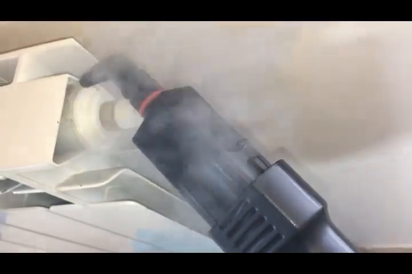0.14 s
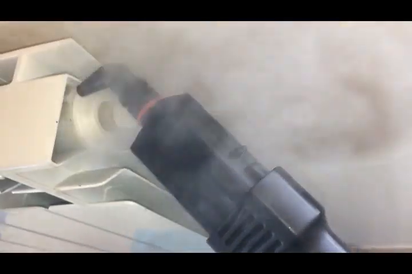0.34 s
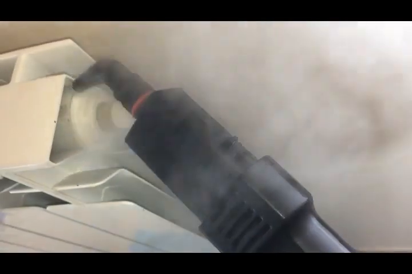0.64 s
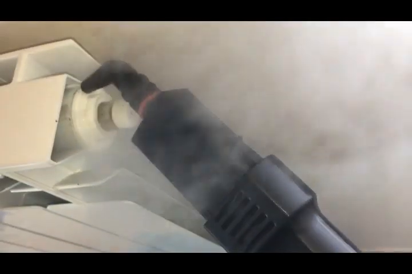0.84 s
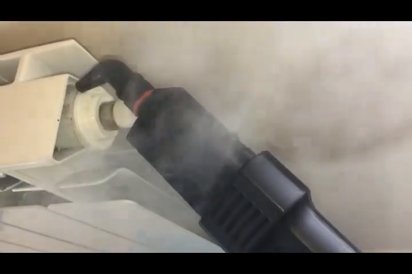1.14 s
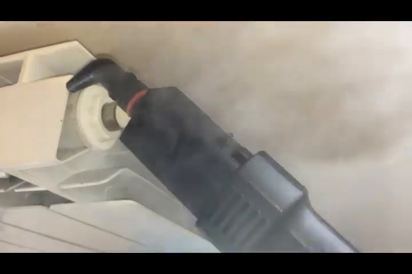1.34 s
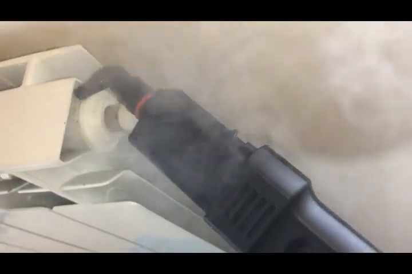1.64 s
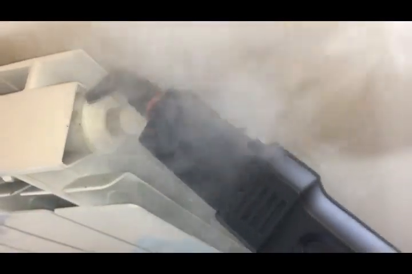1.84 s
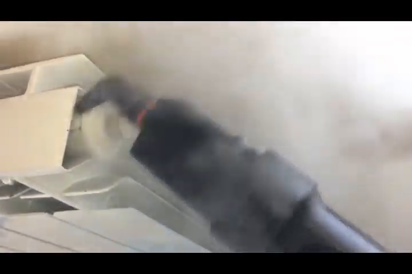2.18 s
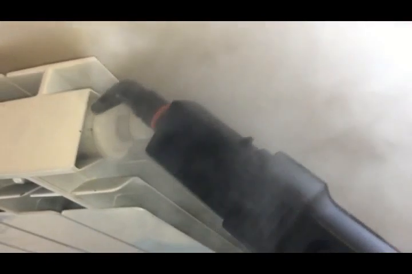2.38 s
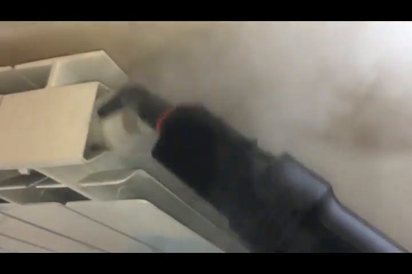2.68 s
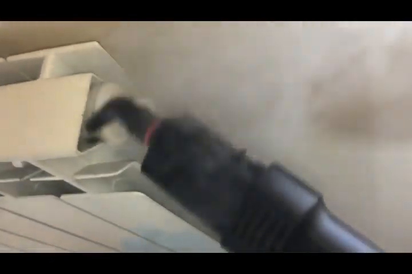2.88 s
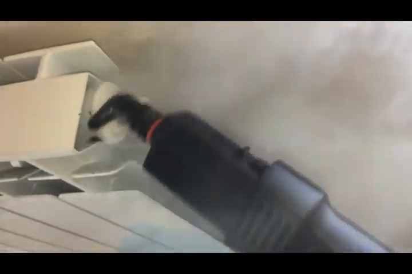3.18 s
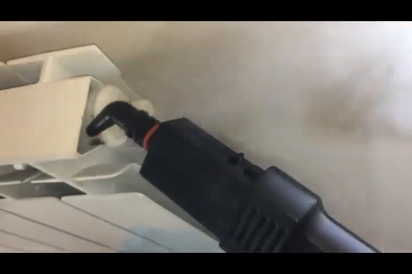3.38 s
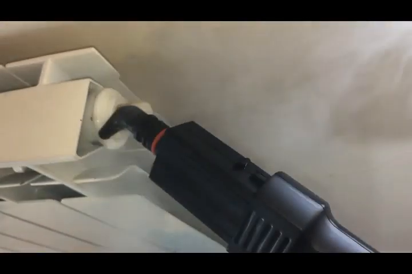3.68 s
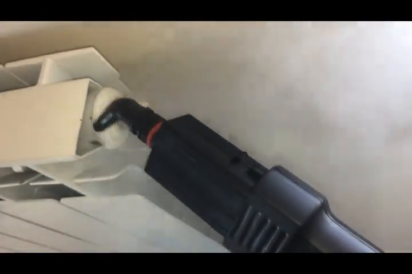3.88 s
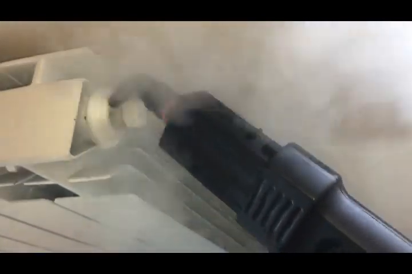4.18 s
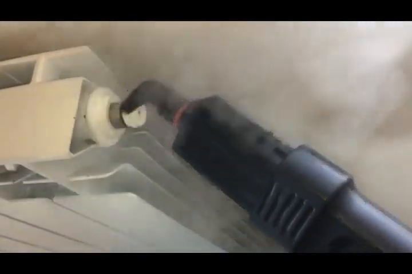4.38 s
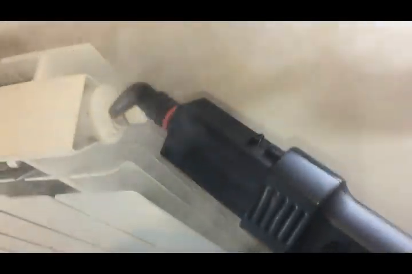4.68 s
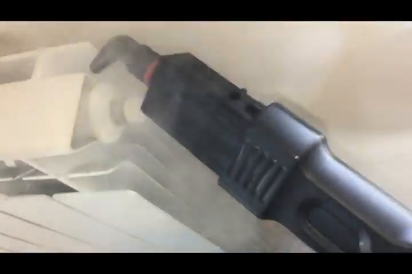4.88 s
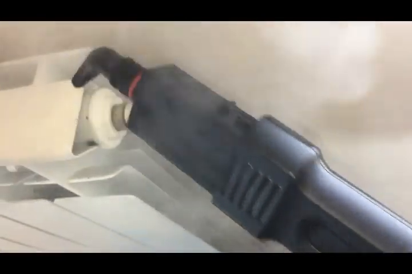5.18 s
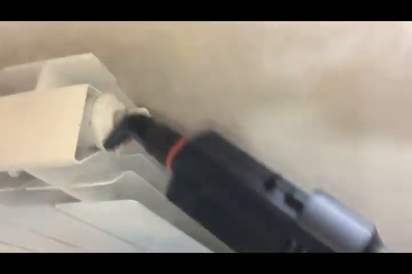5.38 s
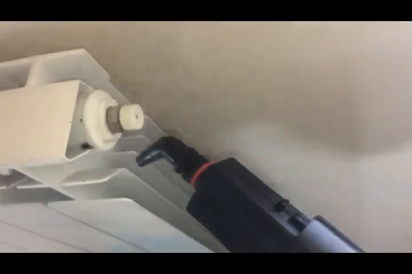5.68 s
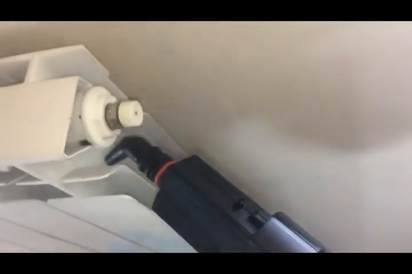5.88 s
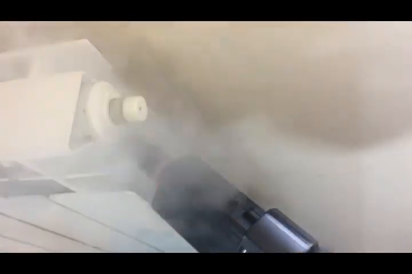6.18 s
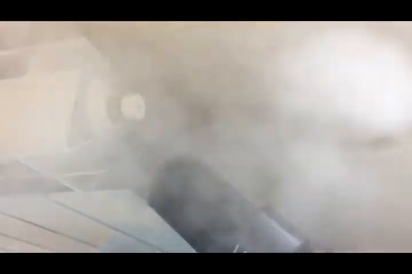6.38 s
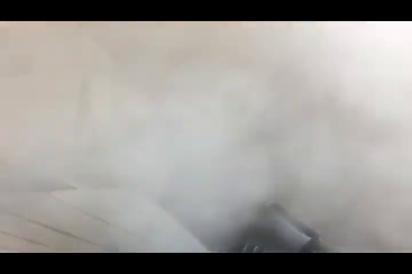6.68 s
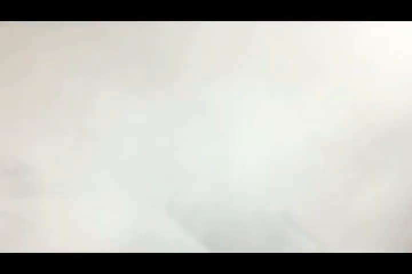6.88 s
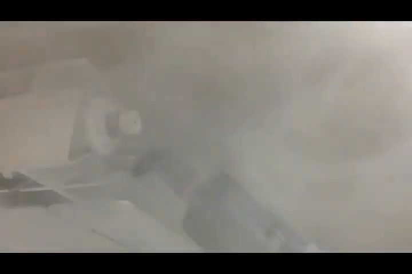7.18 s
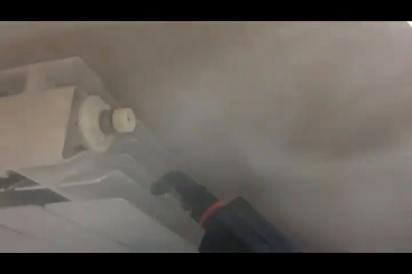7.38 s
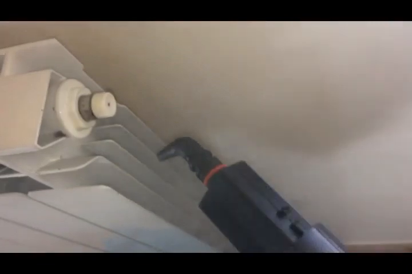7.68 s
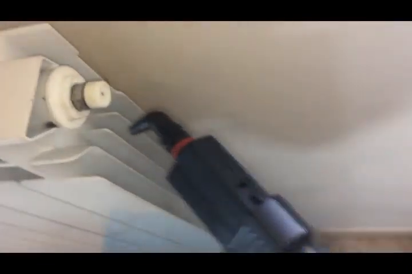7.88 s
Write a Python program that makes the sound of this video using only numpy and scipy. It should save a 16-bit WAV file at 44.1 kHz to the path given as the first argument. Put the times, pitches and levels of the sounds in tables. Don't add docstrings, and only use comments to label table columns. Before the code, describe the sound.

A handheld steam cleaner works on a metal radiator, very close to the microphone in a room with little echo. Loud, bright hissing is already under way at the start, wavering quickly as the nozzle moves. From about 0.9 seconds it weakens, and at 1.3 a small valve click cuts it to a dying leak. After a near-silent gap, a hollow plastic clack at 1.55 releases a sharp puff and a long rough blast. Water droplets make it sputter; its tone sweeps and hollows out, over soft rumbling and breathy ringing from the fins near 2 kHz. Around 4 to 5 seconds the aim dips and the colour changes. Released at 5.4, the hiss sinks steadily until about 6.0, when a tick and stronger clack start a third burst. This holds, wavering, until 7.15, then bleeds away to a thin hiss by 8 seconds.

```python
import sys
import numpy as np
from scipy import signal
from scipy.fft import rfft, irfft
from scipy.io import wavfile
from scipy.ndimage import uniform_filter1d

SR = 44100
rng = np.random.default_rng(int(sys.argv[2]) if len(sys.argv) > 2 else 0)


def voltage_ratio(decibels):
    exponent = np.asarray(decibels, float) / 20
    return 10 ** exponent


def wav_out(sig):
    wavfile.write(sys.argv[1], SR, np.round(np.clip(np.atleast_2d(sig).T, -1, 1) * 32767).astype(np.int16))


N = 354563

# pitch_hz, fade_by_60_db_s
ROOM_FADE = [
    (200, 0.058),
    (2000, 0.18),
    (8000, 0.035),
    (16000, 0.027),
]
FLOOR_DB = -69.5

# start_s, peak_db, pitch_hz, fade_by_60_db_s
GUN_KNOCKS = [
    (1.281, -29, 1200, 0.0078),
    (1.520, -48, 5500, .006),
    (1.535, -45, 3400, 0.03),
    (1.535, -38, 12000, .002),
    (1.545, -27.5, 660, 0.11),
    (1.544, -35, 130, .04),
    (1.548, -34, 333, 0.024),
    (6.035, -35, 140, .06),
    (5.951, -29, 1500, .004),
    (6.034, -21, 650, 0.079),
]

# valve_opens_s, let_go_s, hiss_db, hose_bleeds_for_s
TRIGGER_PULLS = [
    (-.1, 0.91, -14.5, 0.36),
    (1.545, 5.44, -17.5, 0.79),
    (6.034, 7.15, -17.5, .9),
]
RISE_S, BLEED_DB, BLEED_BEND = 0.016, -19.5, 1.26
SHUT_S, SHUT_STEP_DB, SHUT_STEP_S, LEAK_DB_PER_S = 1.282, -19, 0.028, -62
PUFF_S, PUFF_DB, PUFF_FADE_S = 1.549, 6, 0.02

# time_s, share_0_to_1
LOW_AIM = [
    (0, 0.03),
    (3.98, 0.05),
    (4.08, 0.7),
    (4.98, 0.1),
    (5.1, 0.8),
    (5.24, 0),
    (5.4, 0.75),
    (8.04, 0.57),
]
# time_s, level_db, half_width_s, brighter_db_per_6_khz
HAND_SWINGS = [(0, -6.5, 0.035, -4), (.21, 4.5, 0.1, 1.2), (.28, -10, 0.052, -2.5), (.394, -4, 0.02, -2.2),
               (.484, 6., 0.034, 2.3), (.579, 3., .025, 0.3), (.639, -5, 0.023, -2.5),
               (.908, 2.5, 0.034, 2.4), (1.7, 3.5, 0.21, 0), (2.03, -4, 0.055, -1.5),
               (2.127, 6.5, 0.083, 1), (2.361, -3, 0.025, -2.2), (2.55, 1.8, 0.087, -0.3),
               (2.68, 1.5, .04, 2.5), (2.745, 5.5, .03, 1.5), (2.9, -1.5, 0.039, -2.5), (3.07, 1, 0.074, 1),
               (3.41, 1.2, 0.076, 2), (3.99, 1.5, .08, 1), (4.2, -3.5, 0.082, -1), (4.4, 3, .05, 2),
               (4.62, -3, 0.06, -0.5), (4.835, 6, 0.067, 1.5), (4.98, 4, 0.039, 2.2),
               (5.15, 1.8, 0.067, -1), (5.32, -3., 0.083, 0.9), (6.195, 4.5, 0.086, 2.1),
               (6.51, -6, 0.073, -3), (6.925, -5, 0.061, -1), (7.318, -2, 0.045, -1.9)]

# time_s, rumble_db at full pressure
HEAD_ON_DB = [
    [(0, -40), (.21, -40), (.26, -29.5), (.58, -31), (.83, -29.5), (.95, -37), (1.1, -38)],
    [(1.6, -46.5), (1.82, -29), (2.62, -31.5), (3.7, -31.5), (4.05, -37), (4.25, -31), (4.5, -38),
     (5.2, -36), (5.27, -32)],
    [(5.45, -37.5), (5.6, -58), (6.1, -43.5), (6.38, -38), (6.47, -31), (6.63, -33.5), (7.0, -31.5),
     (7.4, -40.5), (7.53, -55)],
]
# pitch_hz, level_db per Hz
STRIKE_COLOUR = [(20, -57), (45, -20.5), (85, -5.5), (140, -10), (200, 1.5), (290, -5.5), (360, -2),
                 (430, -4), (530, -2.5), (900, -3), (1580, -4), (1750, -16), (2300, -22), (3700, -87)]

# pitch_hz, width_hz, level_db
UPPER_FINS = [
    (1600, 45, -14.5),
    (1928, 87, 0),
    (2104, 110, -2.5),
    (2270, 49, -15.5),
    (2407, 27, -11.5),
]
# pitch_hz, width_hz, level_db
LOWER_FINS = [
    (1820, 50, 8.5),
    (2214, 147, 12.5),
    (2534, 750, 12),
    (3350, 960, -13.5),
]
# time_s, ring_db at full pressure
ACROSS_DB = [
    [(0, -26.5), (.39, -34), (.58, -31), (.68, -34), (.81, -25), (.94, -32), (1.14, -21), (1.36, -34)],
    [(1.62, -21.5), (2.14, -29), (2.65, -24.5), (3.58, -29.5), (3.75, -24.5), (4.2, -25), (4.3, -37),
     (5.0, -29.5), (5.19, -21.5)],
    [(5.26, -38), (5.5, -29), (5.85, -25), (6.1, -27.5), (6.25, -29.5), (6.65, -27.5), (6.92, -30.5),
     (7.65, -20.5), (8.04, -48)],
]
RING_FOLLOWS, RUMBLE_FOLLOWS = 0.53, 0.49

# pitch_hz, level_db per Hz
JET_COLOUR = [(600, -13.5), (1500, -6.5), (2600.0, -1.4), (3100.0, 1), (3500.0, -4), (4500.0, -0.1),
              (6000.0, 0.55), (7500.0, 0.65), (9300.0, 2.5), (10700.0, -3.5), (12000.0, 1), (14000.0, 3),
              (15700.0, -1.5)]
# time_s, extra_path_us, signed_gain
GUN_BOUNCE = [(0, 204, .45), (.65, 210, .45), (.72, 194, .55), (1.57, 200, .4), (1.69, 150, .32),
              (1.82, 189, .43), (2.27, 210, .27), (2.6, 245, .2), (2.67, 152, .4), (2.78, 146, .4),
              (2.86, 250, .25), (2.97, 250, .25), (3.02, 152, .4), (3.13, 155, .4), (3.2, 190, .2),
              (4.12, 220, .18), (5.35, 127, .05), (8.04, 120, .24)]
# time_s, extra_path_us, signed_gain
RADIATOR_BOUNCE = [(0, 280, -.33), (.95, 269, -.1), (2.11, 273, -.2), (3.12, 299, .16), (3.49, 303, .48),
                   (3.69, 287, .25), (4.02, 304, .45), (4.38, 230, .3), (5.24, 213, .45), (5.36, 310, .3),
                   (5.5, 390, .5), (5.75, 312, .3), (5.92, 340, .25), (6.15, 303, .44), (6.4, 325, .3),
                   (6.94, 295, .36), (7.52, 430, .3), (8.04, 222, .45)]
# time_s, extra_path_us, signed_gain
WALL_BOUNCE = [(0, 378, -.08), (1.96, 375, -.16), (2.32, 515, .1), (2.43, 471, .41), (2.52, 528, -.06),
               (2.71, 461, .2), (2.76, 530, -.15), (3.37, 632, .17), (4.15, 622, .07), (4.3, 281, .21),
               (4.61, 285, .28), (4.7, 340, .1), (4.94, 313, .2), (5.36, 334, .12), (5.71, 573, -.03),
               (6.18, 504, .24), (6.52, 527, -.12), (8.04, 630, .07)]
BOUNCE_DULLS_HZ = 28000
PASSES_HIGH_AIM_HZ, PASSES_LOW_AIM_HZ = 3200, 1840
DULL_BELOW_DB, DULL_TILT = -26, 0.43


def evened(x):
    return x / np.sqrt(np.mean(x ** 2) + 1e-20)


def read_colour(points, hz):
    f, value = np.transpose(points)
    return np.interp(np.log(hz + 1), np.log(f + 1), value)


def read_stretches(stretches, t):
    return np.interp(t, *np.concatenate(stretches).T)


def spectrum_grid(size):
    return np.fft.rfftfreq(size, 1 / SR), np.arange(N * 4 // size + 5) * (size // 4) / SR


def shaped_noise(gain, size):
    a, b = rng.standard_normal(gain.T.shape + (2,)).T
    sound = signal.istft(gain * (a + 1j * b), nperseg=size, noverlap=size - size // 4)[1]
    return evened(sound[:N])


def patches(hz, t, frames, bins):
    z = rng.standard_normal((len(t), len(hz)))
    for _ in range(2):
        z = uniform_filter1d(z, int(frames), 0)
        z = uniform_filter1d(z, int(bins), 1)
    return evened(z).T


def wander(low_hz, high_hz):
    hz = np.fft.rfftfreq(N, 1 / SR) + 1e-3
    shape = 1 / np.sqrt(hz) / (1 + (low_hz / hz) ** 2) / (1 + (hz / high_hz) ** 2)
    return evened(irfft(rfft(rng.standard_normal(N)) * shape, N))


def room(x):
    taps = np.zeros(SR // 2)
    at = np.arange(60, len(taps) - 20, 20)
    taps[at + rng.integers(0, 20, len(at))] = rng.choice([-1., 1.], len(at))
    hz, t, z = signal.stft(taps, SR, nperseg=256)
    fade_s = np.maximum(read_colour(ROOM_FADE, hz), 0.03)[:, None]
    tail = signal.istft(z * voltage_ratio(-60 * t / fade_s), SR, nperseg=256)[1]
    return signal.fftconvolve(x, tail / np.linalg.norm(tail))[:N]


def background():
    return voltage_ratio(FLOOR_DB) * wander(300, 9000)


def knocks():
    out, t = np.zeros(N + SR), np.arange(SR // 8) / SR
    for start_s, peak_db, hz, fade_s in GUN_KNOCKS:
        onset = 1 - np.exp(-t * hz / 0.85)
        ring = voltage_ratio(peak_db - 60 * t / fade_s) * np.sin(2 * np.pi * hz * t) * onset
        out[round(start_s * SR):][:len(t)] += ring
    return out[:N]


def pressure_db(t):
    opens, let_go, hiss_db, bleed_s = np.transpose(TRIGGER_PULLS)
    since = t - opens[:, None]
    past = np.maximum(t - let_go[:, None], 0) / bleed_s[:, None]
    built = 1 - np.exp(-np.maximum(since, 0) / RISE_S)
    lost = BLEED_DB * np.minimum(past, 1) ** BLEED_BEND
    seated = np.maximum(t - SHUT_S, 0)
    lost[0] += SHUT_STEP_DB * (1 - np.exp(-seated / SHUT_STEP_S)) + LEAK_DB_PER_S * seated
    latest = (since > 0).sum(0) - 1
    return (lost + 20 * np.log10(built + 1e-6)).max(0), hiss_db[latest]


def puff():
    t = np.arange(N) / SR - PUFF_S
    return voltage_ratio(PUFF_DB * (t > 0) * np.exp(-abs(t) / PUFF_FADE_S))


def aimed_low(t):
    return np.clip(np.interp(t, *np.transpose(LOW_AIM)), 0, 1)


def swung(t, index):
    return sum(row[index] * np.exp(-((t - row[0]) / row[2]) ** 2) for row in HAND_SWINGS)


def sputter(slugs, droplets, slow_db, fast_db):
    return evened(voltage_ratio(slow_db * slugs + fast_db * droplets))


def strike_db(t):
    return read_stretches(HEAD_ON_DB, t) + RUMBLE_FOLLOWS * pressure_db(t)[0]


def rumble():
    hz, t = spectrum_grid(size=2048)
    weak_db = np.clip(strike_db(t) + 42, -18, 0)
    thin_db = 0.45 * np.outer(np.clip(1 - hz / 900, 0, 1), weak_db)
    muffled_db = -4.5 * np.outer(np.clip(hz / 400 - 2, 0, 1), aimed_low(t))
    colour = voltage_ratio(read_colour(STRIKE_COLOUR, hz)[:, None] + thin_db + muffled_db)
    colour /= np.sqrt((colour ** 2).mean(0))
    lumps = voltage_ratio(1.93 * patches(hz, t, 3, 10.7))
    return voltage_ratio(strike_db(np.arange(N) / SR)) * shaped_noise(colour * lumps, size=2048)


def fin_colour(modes, hz):
    power = sum(voltage_ratio(2 * db) / (1 + (2 * (hz - f) / width) ** 2) ** 2 for f, width, db in modes)
    return evened(np.sqrt(power))


def fins():
    hz, t = spectrum_grid(size=2048)
    low_share = aimed_low(t)
    upper = np.outer(fin_colour(UPPER_FINS, hz), 1 - low_share)
    lower = np.outer(fin_colour(LOWER_FINS, hz), 1.23 * low_share)
    t = np.arange(N) / SR
    strength = voltage_ratio(read_stretches(ACROSS_DB, t) + RING_FOLLOWS * pressure_db(t)[0])
    return strength * shaped_noise(upper + lower, size=2048)


def bounce_comb(hz, t):
    turn, bounced = -2j * np.pi * hz / 10 ** 6, 0
    for path in (GUN_BOUNCE, RADIATOR_BOUNCE, WALL_BOUNCE):
        time_s, delay_us, gain = np.transpose(path)
        delay = uniform_filter1d(np.interp(t, time_s, delay_us), size=24)
        bounced += np.interp(t, time_s, gain) * np.exp(turn * delay)
    passes_hz = np.interp(aimed_low(t), (0, 1), (PASSES_HIGH_AIM_HZ, PASSES_LOW_AIM_HZ))
    bounced *= np.exp(-hz / BOUNCE_DULLS_HZ) / (1 + (passes_hz / (hz + 1)) ** 4)
    bounced *= 1.3 + 0.15 * aimed_low(t)
    return (abs(1 + bounced) + 0.08) ** 1.5


def hiss():
    bins, t = spectrum_grid(size=512)
    hz = bins[:, None]
    scatter_db = (0.38 + 3.1 * hz / 12000) * patches(bins, t, 19, 4)
    scatter_db *= 1 - 0.6 * aimed_low(t)
    tilt_db = DULL_TILT * np.minimum(pressure_db(t)[0] - DULL_BELOW_DB, 0) + swung(t, index=3)
    tilt = np.maximum(hz - 9000, -7000) / 6000 * tilt_db
    gain = bounce_comb(hz, t) * voltage_ratio(read_colour(JET_COLOUR, bins)[:, None] + tilt + scatter_db)
    gain *= np.minimum(hz / (900 + 900 * aimed_low(t) ** 2), 1) ** 2
    gain /= np.sqrt((gain[bins > 4000] ** 2).mean(0))
    t = np.arange(N) / SR
    level = voltage_ratio(sum(pressure_db(t)) + swung(t, index=1))
    return level * puff() * shaped_noise(gain, size=512)


def scene():
    shake = wander(16, 48), wander(42, 900)
    roar = voltage_ratio(0.37) * rumble() * sputter(*shake, slow_db=0.86, fast_db=0.69)
    ring = voltage_ratio(-1.5) * fins() * sputter(*shake, slow_db=0.8, fast_db=1.8)
    jet = voltage_ratio(1.6) * hiss() * sputter(*shake, slow_db=0.3, fast_db=1.48)
    near = jet + ring + roar + knocks()
    mono = near + voltage_ratio(-11.5) * room(near) + background()
    return np.array([mono, mono])


def top_cut(x):
    return signal.sosfilt(signal.butter(12, 17030, fs=SR, output="sos"), x)


def record(dry):
    edge = signal.firwin(511, 15800, window=("kaiser", 9), fs=SR)
    overloaded = np.tanh(dry / 1.3) * 1.3
    limited = signal.oaconvolve(overloaded, edge[None], "same")
    bass_cut = signal.butter(2, 40, "high", fs=SR, output="sos")
    mix = signal.sosfilt(bass_cut, limited)
    return top_cut(mix)


dry = scene()
out = record(dry)
wav_out(out)
```